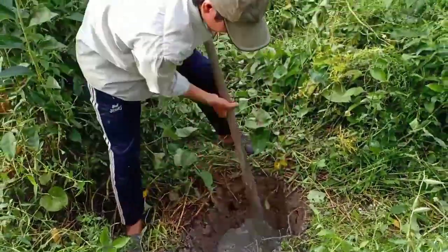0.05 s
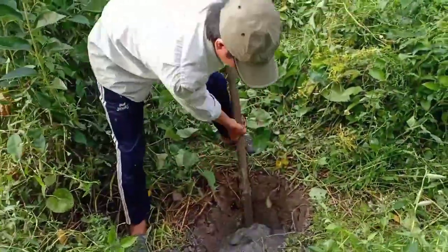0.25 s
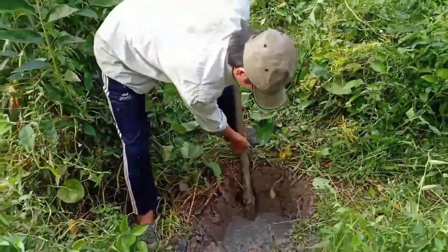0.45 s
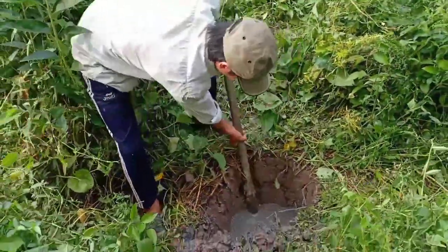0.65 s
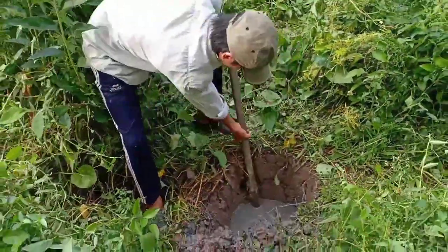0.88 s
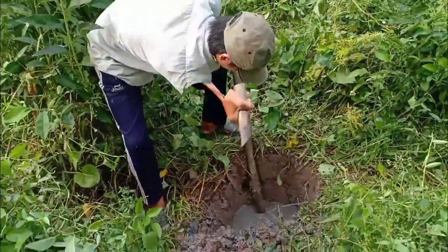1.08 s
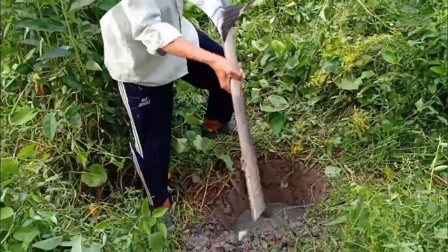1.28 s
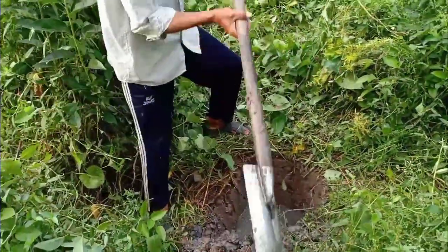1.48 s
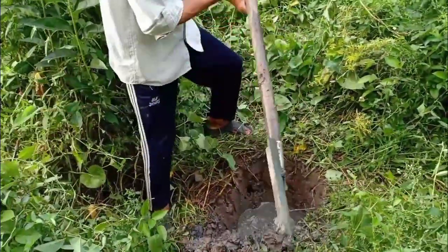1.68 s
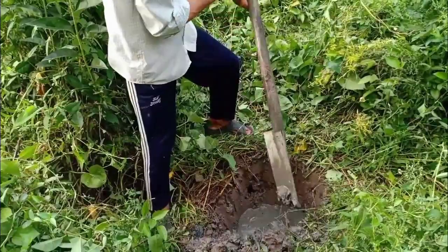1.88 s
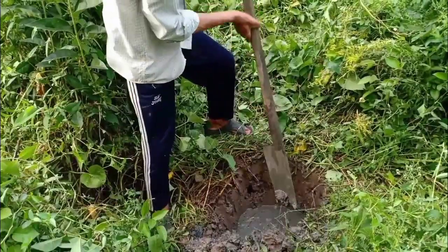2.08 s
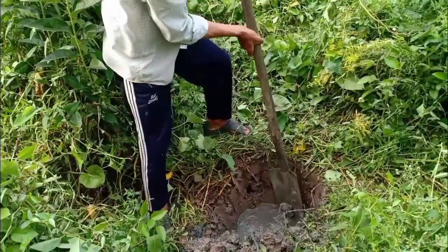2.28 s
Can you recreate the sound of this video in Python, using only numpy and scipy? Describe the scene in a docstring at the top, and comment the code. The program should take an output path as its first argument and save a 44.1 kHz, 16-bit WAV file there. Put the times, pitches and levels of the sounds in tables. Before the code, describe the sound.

A shovel is levered in wet mud, making small pops and snaps, then one loud suction smack. A faint squelch and a few late ticks follow, over soft foliage hiss, distant rumble and light wind on the microphone.

```python
"""A field: a shovel is levered in a hole of wet mud. Small air pockets pop and wet films snap,
then the suction lets go with one loud smack that rings the cavity. The blade slides out with a
faint squelch and a few late ticks follow. Behind it a distant rumble and a soft foliage hiss
sink away, and light wind nudges the microphone."""
import sys
import numpy as np
from scipy import signal
from scipy.fft import rfft, irfft
from scipy.io import wavfile
from scipy.ndimage import uniform_filter1d, map_coordinates

SR = 44100
rng = np.random.default_rng(int(sys.argv[2]) if len(sys.argv) > 2 else 0)


def persist_wave(psi):
    """Save psi, clipped to +-1, as 16-bit WAV."""
    counts = np.round(np.clip(psi, -1, 1) * 32767).astype(np.int16)
    wavfile.write(sys.argv[1], SR, np.atleast_2d(counts).T)


N = 108045
T = np.arange(N) / SR


def smack():
    """Mud tears, the seal breaks and rings the cavity, and duller spatter dies away."""
    # modes of the mud cavity and blade: pitch_hz, relative_db, t60_s
    cavity_modes = [(262, -25, 0.034), (410, -19, 0.06), (600, -13, 0.018), (865, -8, 0.021),
                    (1150, -6.5, 0.015), (1476, -12, 0.019), (1700, -16.5, 0.011), (2380, -12.5, 0.016),
                    (3560, -19, 0.014), (5860, -19, 0.0068), (6200, -23, 0.006), (8000, -18, .005)]
    # spectrum of tearing mud: freq_hz, density_db
    tear_spectrum = [(200, -10), (500, 7), (1500, 1.5), (2000, -6), (2450, 3.5), (3000, -18), (4700, -13.5),
                     (6100, 1.5), (8200, -13.5), (9800, -24.5), (15000, -22)]
    # spectrum of falling spatter: freq_hz, density_db
    spatter_spectrum = [(200, -21), (550, -6), (1000, -6), (1500, 7.5), (2000, 1), (2500, 3.5), (3500, -6),
                        (4700, -13), (6200, -13), (9000, -32), (15000, -32)]
    release_s, swell_s, tear_t60_s, spatter_t60_s = 0.4, 0.0019, 0.035, 0.15
    grains_per_s = 7000
    ring, t = np.zeros((2, N)), T[:SR // 5]
    modes = sum(from_db(db - 60 * t / t60_s) * np.sin(2 * np.pi * hz * t)
                for hz, db, t60_s in cavity_modes)
    add(ring, release_s, from_db(-15.5) * modes[None])
    swell = np.exp(-np.maximum(release_s - T, 0) / swell_s)
    since_s = np.maximum(T - release_s, 0)
    side = butter(grains(tear_spectrum, grains_per_s), 4000, "high")   # stereo width in the treble
    mid = grains(tear_spectrum, grains_per_s)
    tear = from_db(-27.5 - 60 * since_s / tear_t60_s) * (mid + side * [[1], [-1]])
    spatter = from_db(-39.5 - 60 * since_s / spatter_t60_s) * grains(spatter_spectrum, grains_per_s)
    return pan(left_db=1.5) * (ring + swell * (tear + spatter))


def pops():
    """Air pockets open in the mud and ring briefly, most gliding up or down in pitch."""
    # air pockets: start_s, pitch_hz, relative_glide_per_s, level_db, rise_s, t60_s, left_db
    pockets = [(.129, 3230, -6, -53, 0.0018, .025, 2), (.1708, 1730, 29.5, -42.5, 0.0041, 0.025, 4),
               (.1935, 2110, 0, -46.5, .004, 0.027, 15), (.198, 960, 1, -51, .004, 0.055, -5),
               (.2068, 2200, 10, -46, .001, .012, 7), (0.22, 2720, 25, -40.5, 0.00074, .014, 2),
               (.2278, 2560, 23, -44, 0.00076, 0.011, 2),
               (0.2385, 2550, -11.5, -18.5, 0.00079, 0.0092, 5.5),
               (0.239, 1034, -3, -35.5, .0005, 0.012, -2), (0.243, 2350, -5, -35.5, 0.0013, 0.028, 12),
               (.2885, 2640, -15, -46, 0.00067, .014, 5), (.29, 371, 5.5, -46.5, 0.0049, 0.043, 0),
               (.2982, 2600, 24, -34, 0.0014, 0.011, 14), (.4026, 568, 3.5, -18, 0.00081, 0.02, 1),
               (0.4055, 1254, -25, -26, 0.0015, 0.026, 0), (0.4175, 1400, -12, -30, 0.00083, 0.014, 5),
               (.431, 764, 7.5, -41, 0.0032, 0.052, 0), (0.4509, 1420, 5, -34, 0.0013, 0.016, 4),
               (0.4644, 953, -7, -31, 0.00054, 0.023, -1.5), (.488, 2030, 13, -43.5, 0.00083, .014, 10),
               (.944, 2350, -0.5, -51.5, 0.0064, 0.026, 6), (1.259, 995, -17, -54.5, 0.0023, 0.015, -3),
               (1.281, 2390, -24, -50.5, .002, 0.016, 9), (1.298, 1135, 20, -55.5, .003, 0.04, 1),
               (1.389, 4050, 9, -49, .0012, 0.014, 5), (1.654, 3850, 5, -63, .003, 0.027, 6),
               (2.095, 780, 2, -64, .002, 0.061, -3), (2.133, 2270, 4, -54, 0.00073, 0.013, 10),
               (2.3428, 3630, 5, -47.5, .001, 0.015, 10), (2.351, 1165, 0, -57.5, 0.0013, 0.047, 1),
               (2.3775, 2050, -15, -54.5, .0007, .014, 4), (2.379, 924, -16, -55, .001, 0.023, 0),
               (2.414, 2630, 6, -48.5, 0.00079, .017, 2), (2.4412, 2750, -15, -39.5, 0.0021, 0.033, 6)]
    overtone_db = -16
    out, t = np.zeros((2, N)), T[:SR // 10]
    for start_s, pitch_hz, glide_per_s, level_db, rise_s, t60_s, left_db in pockets:
        phase = 2 * np.pi * pitch_hz * (t + glide_per_s * t * t / 2)
        attack = np.sin(np.pi / 2 * np.minimum(t / rise_s, 1)) ** 2
        envelope = attack * from_db(-60 * np.maximum(t - rise_s, 0) / t60_s)
        tone = np.sin(phase) + from_db(overtone_db) * envelope * np.sin(2 * phase)
        add(out, start_s, pan(left_db) * from_db(level_db) * envelope * tone)
    return out


def snaps():
    """Thin films of mud break in short bursts of noise."""
    # film snaps and soft scuffs: start_s, centre_hz, level_db, t60_s, broadband_db, left_db
    films = [(.056, 1580, -44.5, 0.008, -27, 1), (.1575, 7360, -48, .008, -6, 6),
             (.161, 5300, -49, 0.011, -12, 3), (.2205, 6030, -49.5, 0.037, 1, 3),
             (0.2386, 3610, -32.5, 0.019, -19, 0.5), (.289, 1220, -43.5, 0.014, -18, 4),
             (.2988, 6460, -43, 0.017, -16, 12), (.4085, 1490, -41, 0.037, -35, 2),
             (.4395, 5400, -49, 0.015, -20, 0), (.4465, 6850, -50, 0.016, -20, 15),
             (.4648, 6300, -52.5, .009, 2, 2), (1.198, 4720, -64, .02, -12, -5),
             (1.286, 1900, -54, .012, -22, 4), (1.287, 955, -44.5, .016, -25, -1),
             (1.654, 5000, -63, .025, -15, 8), (1.701, 5500, -58, 0.0071, -2, 4),
             (2.343, 4400, -54, .018, -15, 0), (2.411, 6360, -61, 0.011, 0, 18),
             (2.414, 5900, -54.5, 0.017, 4, 5), (2.432, 2940, -55, 0.081, -15, 4),
             (2.442, 1140, -54, 0.037, -25, 2), (2.4425, 5840, -57, .03, 1, 15)]
    # spectrum of a snap's broadband part: freq_hz, density_db
    broadband_spectrum = [(500, -6), (2000, 0), (7500, 0), (9500, -25), (12500, -4), (14500, -8)]
    rise_s = 0.00037
    broadband = colour(rng.standard_normal((2, N)), broadband_spectrum)
    white = rng.standard_normal(N)
    out, t = np.zeros((2, N)), T[:SR // 10]
    for k, (start_s, centre_hz, level_db, t60_s, broadband_db, left_db) in enumerate(films):
        span = (np.arange(len(t)) + k * len(t)) % N   # fresh noise for each snap
        attack = np.minimum(t / rise_s, 1)
        envelope = attack * from_db(level_db - 60 * np.maximum(t - rise_s, 0) / t60_s)
        band = resonance(white[span], centre_hz, width_hz=0.22 * centre_hz)
        burst = band + from_db(broadband_db) * broadband[:, span]
        add(out, start_s, pan(left_db) * envelope * burst)
    return out


def blade():
    """The blade presses on the mud with a dull rub and drags wet grit as it comes out."""
    # rub of the pressing blade: time_s, level_db
    press_levels = [(0, -74), (.09, -64), (.15, -59), (.22, -65), (.3, -65), (.38, -72), (.5, -84),
                    (1.74, -89), (1.8, -63), (1.86, -84)]
    # blade sliding out: time_s, level_db
    slide_levels = [(1.2, -78), (1.26, -66.5), (1.29, -60.5), (1.33, -66), (1.39, -67.5), (1.46, -75.5)]
    # spectrum of wet grit: freq_hz, density_db
    squelch_spectrum = [(150, -8), (400, 4.5), (1100, -9.5), (2300, -1), (3500, -11), (8000, -24),
                        (15000, -38)]
    rub = gain_curves(press_levels)[0] * resonance(rng.standard_normal(N), centre_hz=400, width_hz=260)
    squelch = gain_curves(slide_levels)[0] * grains(squelch_spectrum, rate_per_s=700)
    return pan(left_db=1.5) * (rub + squelch)


def reflections(x):
    """The pit and the plants scatter a short dull tail, different on each side."""
    rise_s, t60_s, cutoff_hz = 0.0051, 0.073, 4860
    t = T[:SR // 4]
    envelope = np.minimum(t / rise_s, 1) * from_db(-60 * t / t60_s)
    tail = butter(rng.standard_normal((2, len(t))) * envelope, cutoff_hz, "low")
    tail *= np.sqrt(2 * cutoff_hz / SR / np.sum(tail ** 2, axis=1, keepdims=True))   # passband gain ~1
    return from_db(-10) * signal.fftconvolve(x, tail, axes=1)[:, :N]


def wind():
    """Short low puffs hit the microphone, mostly on one side."""
    # wind buffets: peak_s, level_db, sigma_s, left_db
    buffets = [(.061, -44.5, 0.0053, -28), (0.106, -55.5, 0.0089, -22), (0.55, -58, 0.01, 11),
               (0.618, -50.5, 0.0092, -6), (0.741, -51.5, 0.053, 26), (.755, -41.5, 0.0064, 31),
               (0.936, -53.5, 0.027, 15), (1.04, -57, 0.017, 8), (1.284, -57, 0.026, 6),
               (1.357, -55, 0.027, -25), (1.805, -58, 0.0093, -1), (2.006, -62, 0.017, -2)]
    # spectrum of a buffet: freq_hz, density_db
    buffet_spectrum = [(20, -24), (50, -10), (90, 1), (125, -2), (180, -17), (400, -29), (1000, -54),
                       (4000, -82)]
    air = colour(rng.standard_normal((2, N)), buffet_spectrum)
    steady_air = air / np.sqrt(uniform_filter1d(air ** 2, size=700) + 1e-6)
    puffs = sum(pan(left_db) * from_db(level_db) * np.exp(-((T - peak_s) / sigma_s) ** 2 / 2)
                for peak_s, level_db, sigma_s, left_db in buffets)
    return steady_air * puffs


def outdoors():
    """Distant rumble and a wide hiss of foliage sink away."""
    # background levels: time_s, rumble_db, hiss_db
    levels = [(0, -57, -58), (.15, -61.5, -58.5), (.37, -61, -57), (.55, -58, -59.5), (.68, -58.5, -57),
              (.85, -59, -58.5), (1.0, -61, -63.5), (1.23, -63, -65), (1.46, -67, -67.5), (1.7, -66, -68.5),
              (1.97, -67.5, -70.5), (2.28, -67, -68), (2.45, -67.5, -65.5)]
    # spectrum of the rumble: freq_hz, density_db
    rumble_spectrum = [(20, -9), (50, -1), (95, 6), (160, -2.5), (330, -3), (600, -6.5), (1000, -8),
                       (1500, -17), (2500, -22), (6000, -54)]
    # spectrum of the foliage: freq_hz, density_db
    hiss_spectrum = [(500, -25), (1200, -8.5), (1700, -1.5), (2300, 4), (2800, -0.5), (3500, -6.5),
                     (4600, -5), (5900, -3.5), (7200, -13), (9500, -22.5), (12500, -19.5), (14500, -19),
                     (16000, -25)]
    # likeness of left and right: freq_hz, correlation
    likeness = [(60, 0.4), (130, 0.27), (290, 0.9), (640, 0.13), (1400, 0), (3100, 0.08), (7000, 0)]
    correlation, out = at_bins(likeness), 0
    for gain, spectrum in zip(gain_curves(levels), (rumble_spectrum, hiss_spectrum)):
        mid, side = rfft(rng.standard_normal((2, N)))
        stereo_bins = np.sqrt(1 + correlation) * mid + np.sqrt(1 - correlation) * side * [[1], [-1]]
        out = out + gain * colour(irfft(stereo_bins, N), spectrum)
    return pan(left_db=1.24) * out


def grains(spectrum, rate_per_s):
    """Wet crackle: random impulses of uneven size; rms 1."""
    sizes = from_db(3 * np.minimum(rng.exponential(1, N), 3)) * rng.choice([-1, 1], N)
    hits = rng.random(N) < rate_per_s / SR
    return colour(sizes * hits, spectrum)


def resonance(x, centre_hz, width_hz):
    """A resonator applied twice, for steep skirts; rms 1."""
    radius = np.exp(-np.pi * width_hz / SR)
    section = [1, 0, -1, 1, -2 * radius * np.cos(2 * np.pi * centre_hz / SR), radius ** 2]
    return rms_one(signal.sosfilt([section, section], x))


def butter(x, cutoff_hz, kind):
    """Second-order low- or high-pass."""
    return signal.sosfilt(signal.butter(2, cutoff_hz, kind, fs=SR, output="sos"), x)


def colour(x, spectrum):
    """Shape a steady sound by rows of (freq_hz, density_db); rms 1."""
    return rms_one(irfft(rfft(x) * from_db(at_bins(spectrum)), N))


def at_bins(rows):
    """Rows of (freq_hz, value), interpolated over log frequency at every FFT bin."""
    freq_hz, value = np.transpose(rows)
    bin_hz = np.arange(N // 2 + 1) * SR / N
    return np.interp(np.log(bin_hz + 1e-3), np.log(freq_hz), value)


def gain_curves(rows):
    """One gain curve per level column from rows of (time_s, level_db, ...)."""
    time_s, *columns_db = np.transpose(rows)
    return [from_db(np.interp(T, time_s, level_db)) for level_db in columns_db]


def from_db(db):
    """Decibels to gain."""
    return 10 ** (np.asarray(db) / 20)


def rms_one(x):
    """Scale to unit rms."""
    return x / np.sqrt(np.mean(x ** 2) + 1e-20)


def pan(left_db):
    """Constant-power gains, left over right by left_db."""
    return rms_one(from_db(np.array([[left_db], [-left_db]]) / 2))


def add(out, start_s, sound):
    """Mix a short sound in at start_s."""
    i = int(np.clip(start_s * SR, 0, N - 1))
    out[:, i:i + sound.shape[-1]] += sound[:, :N - i]


def scene():
    """The digging, slightly to the left, in the open air."""
    low_cut_hz, right_lag_s = 256, 0.00002   # the mud sounds carry little bass
    left, right = butter(pops() + snaps() + smack() + blade(), low_cut_hz, "high")
    late_right = map_coordinates(right, [np.arange(N) - right_lag_s * SR], order=3)
    mud = np.array([left, late_right])
    return mud + reflections(mud) + wind() + outdoors()


def record(dry):
    """Steep low-pass on the top treble."""
    cutoff_hz = 15800
    return signal.sosfilt(signal.ellip(10, .1, 70, cutoff_hz, fs=SR, output="sos"), dry)


dry = scene()
out = record(dry)
persist_wave(out)
```